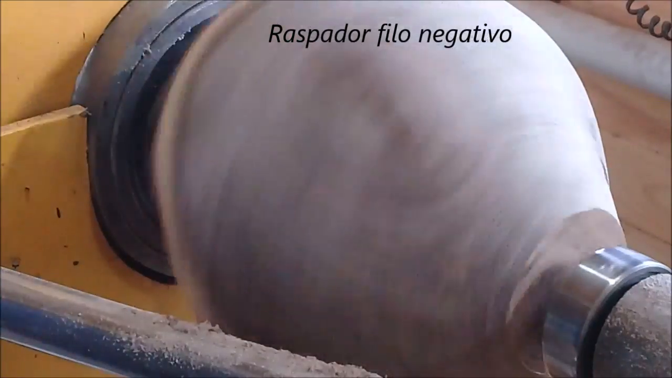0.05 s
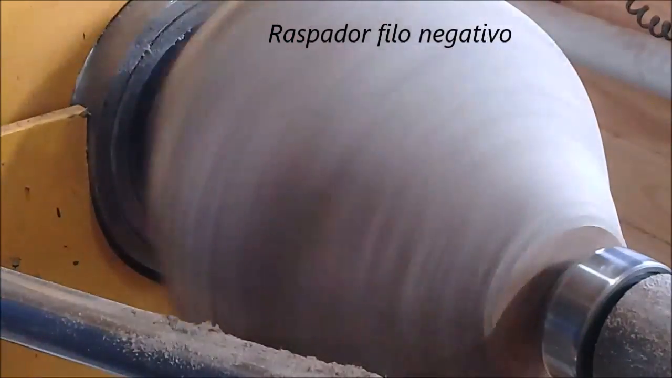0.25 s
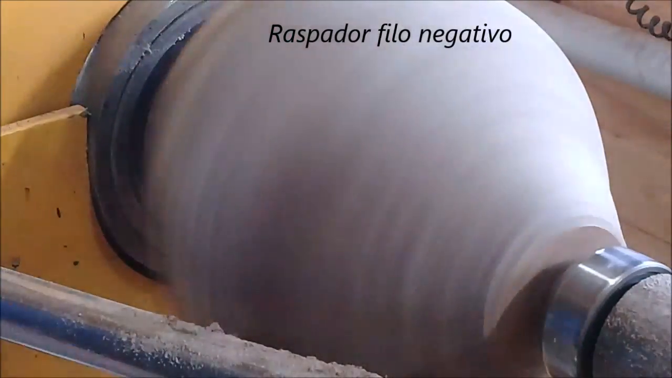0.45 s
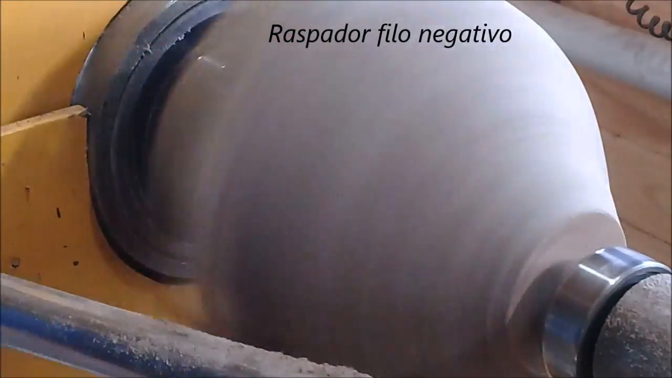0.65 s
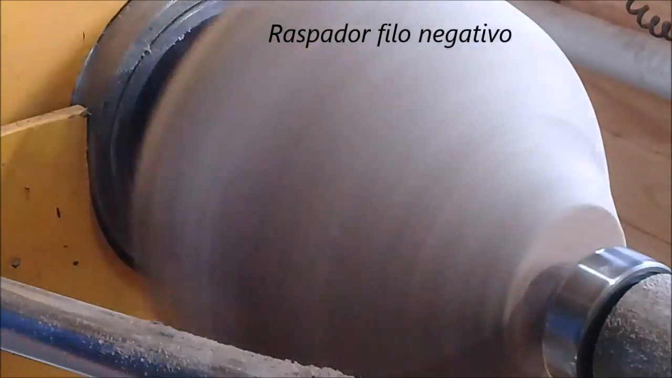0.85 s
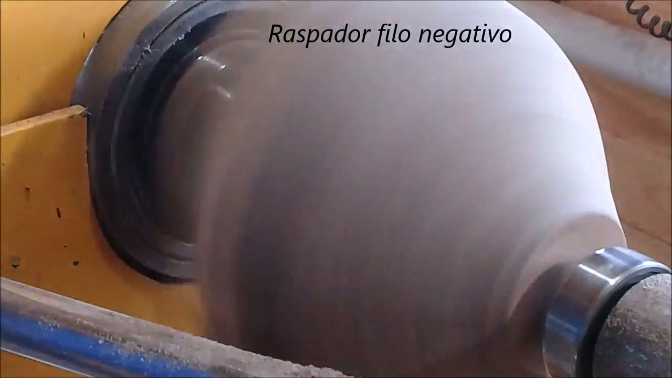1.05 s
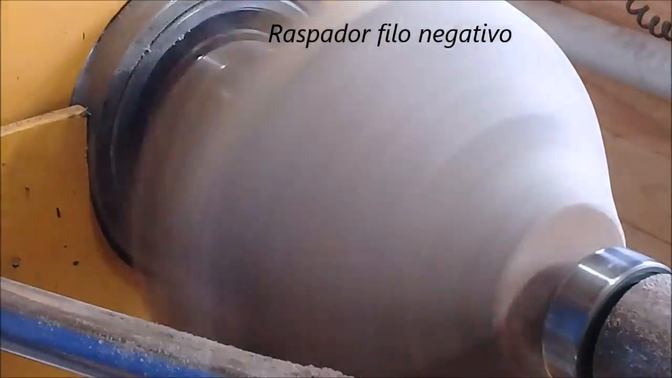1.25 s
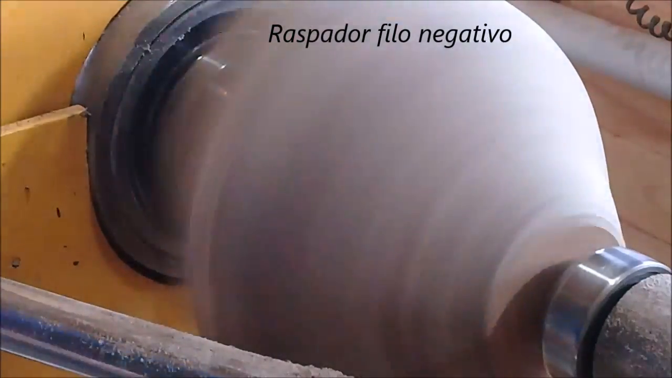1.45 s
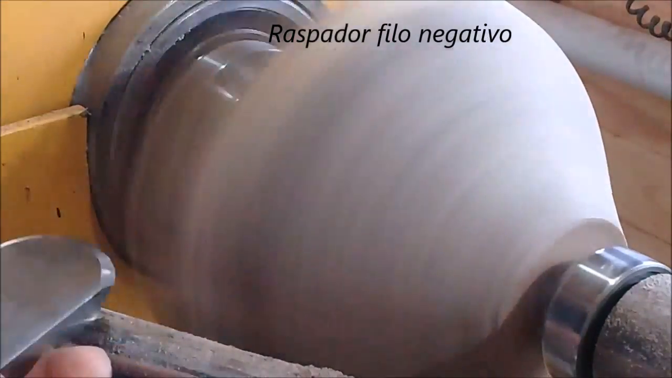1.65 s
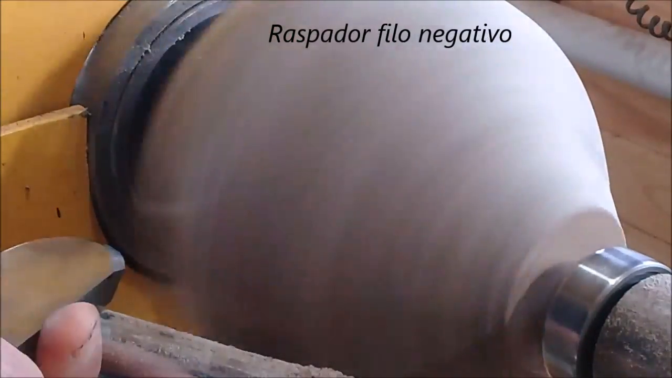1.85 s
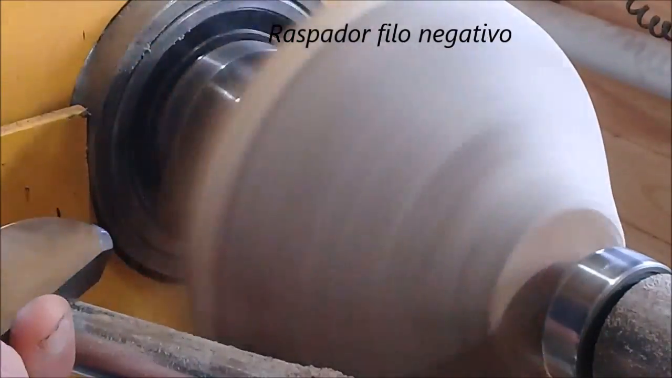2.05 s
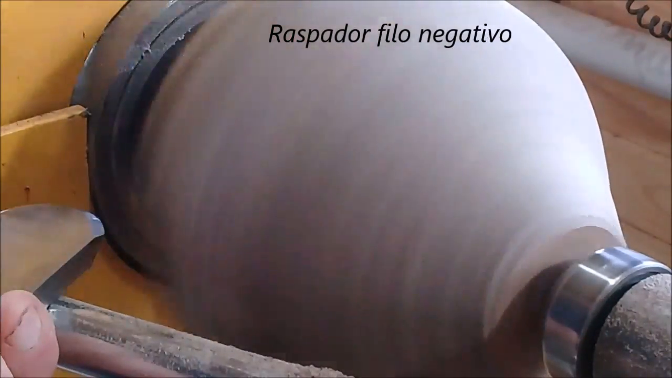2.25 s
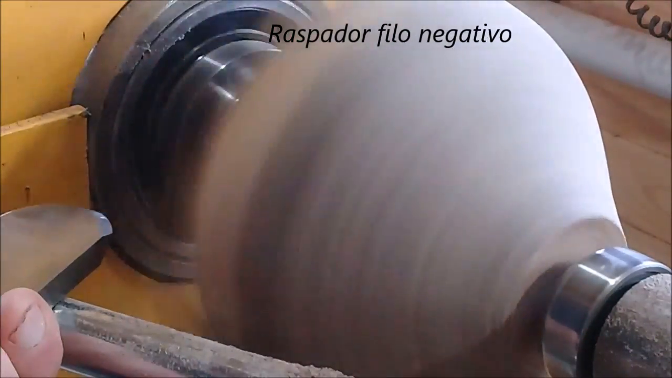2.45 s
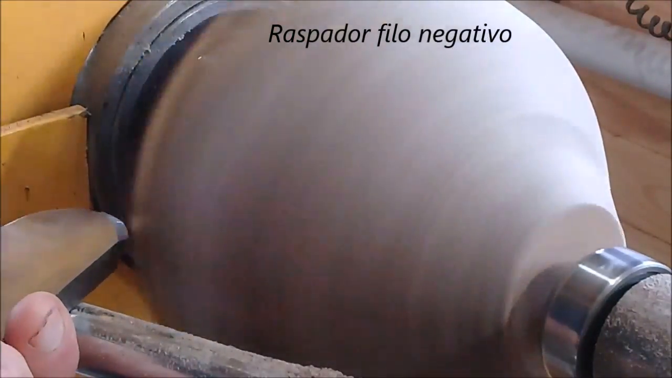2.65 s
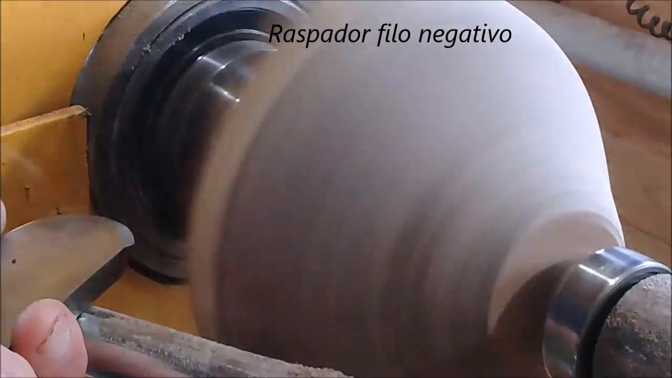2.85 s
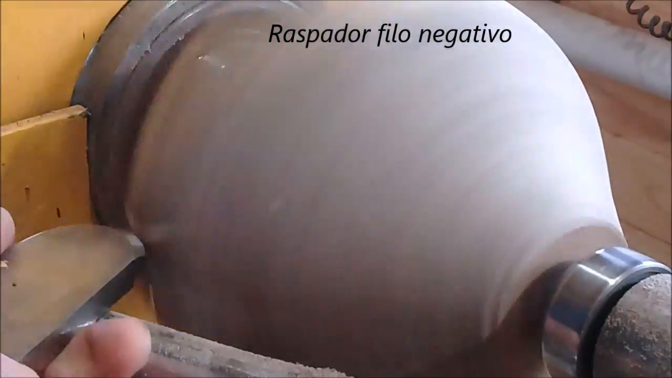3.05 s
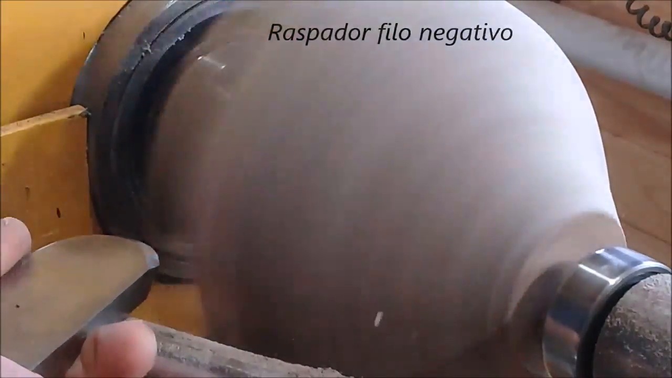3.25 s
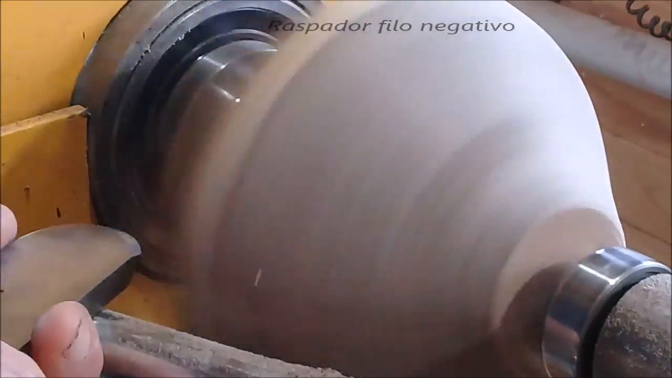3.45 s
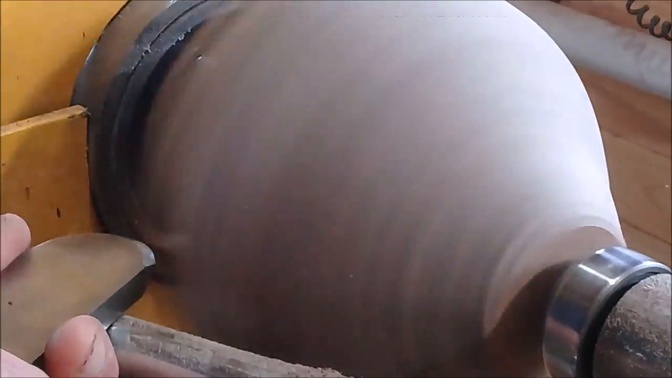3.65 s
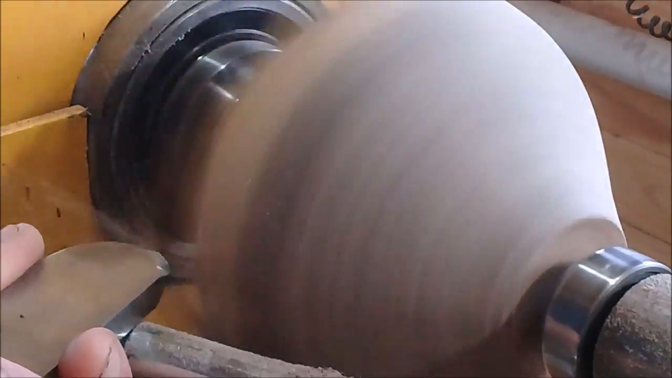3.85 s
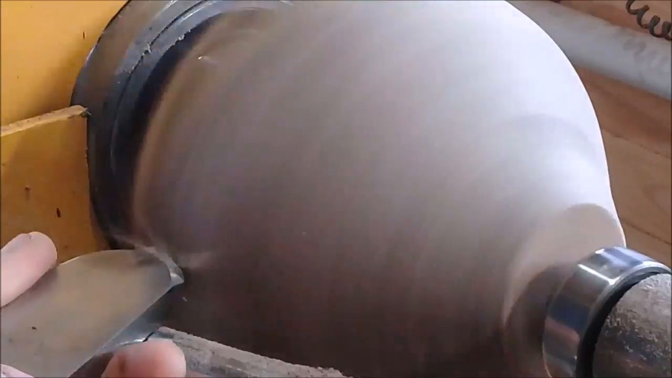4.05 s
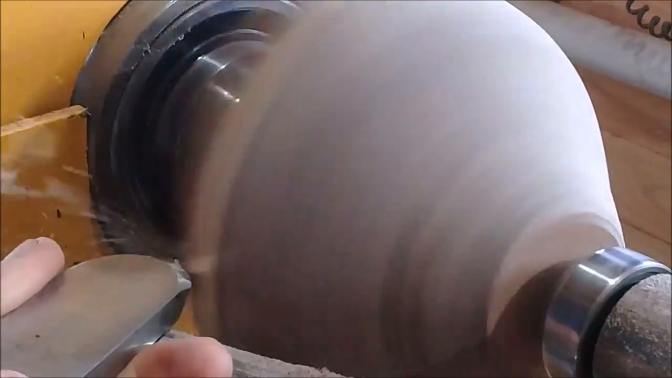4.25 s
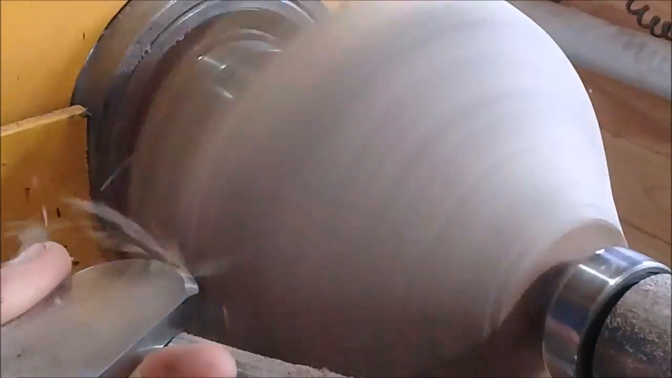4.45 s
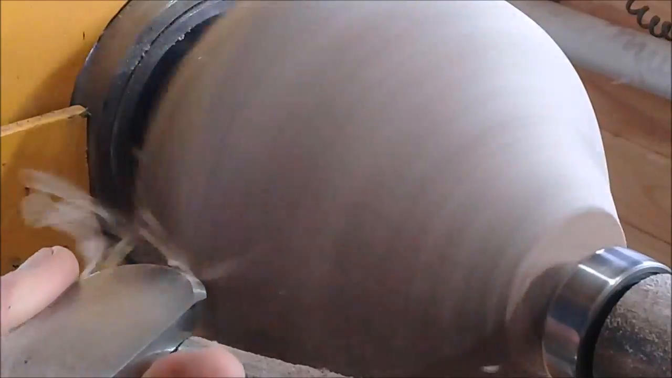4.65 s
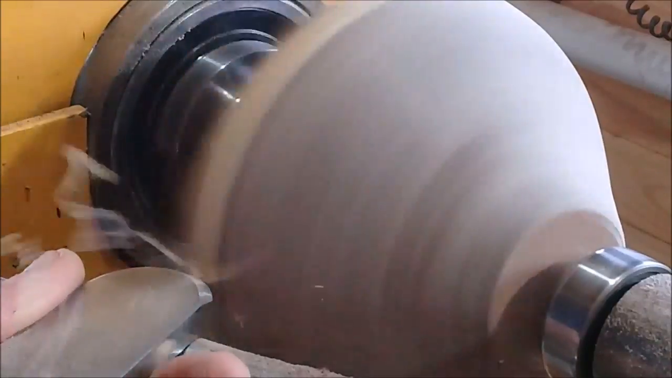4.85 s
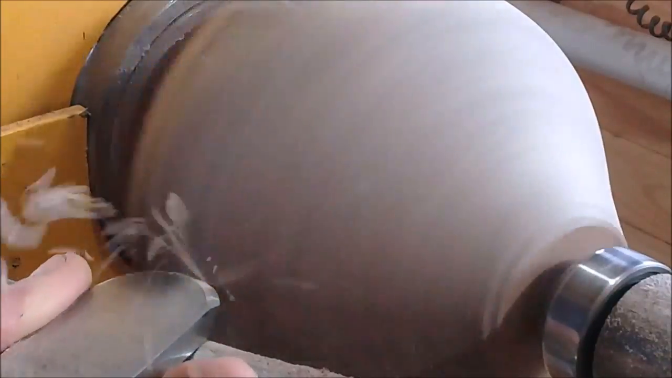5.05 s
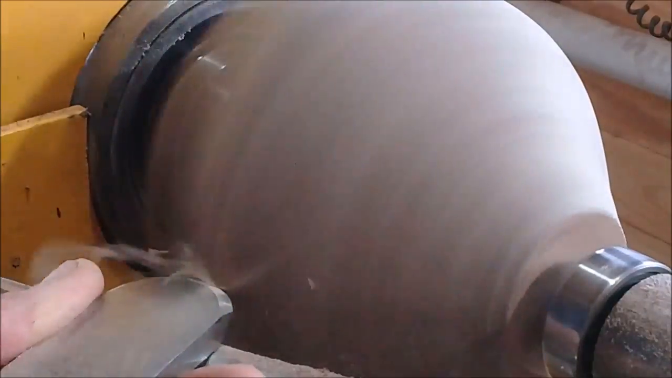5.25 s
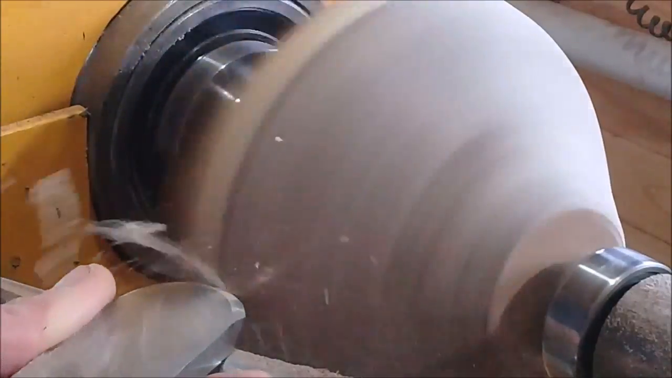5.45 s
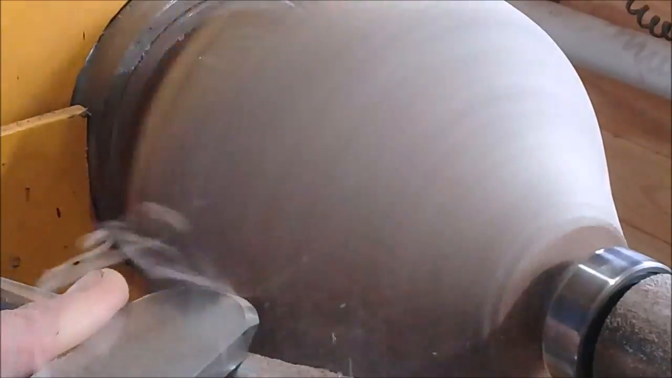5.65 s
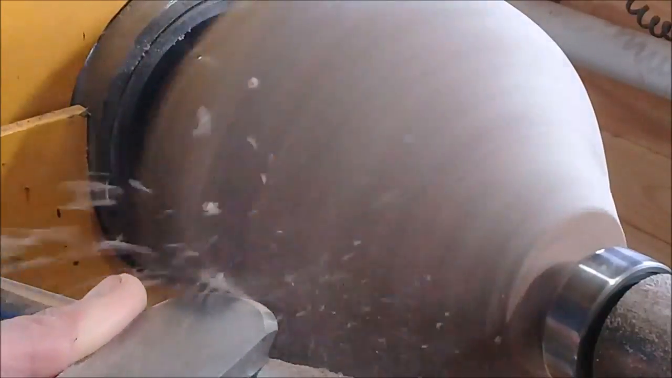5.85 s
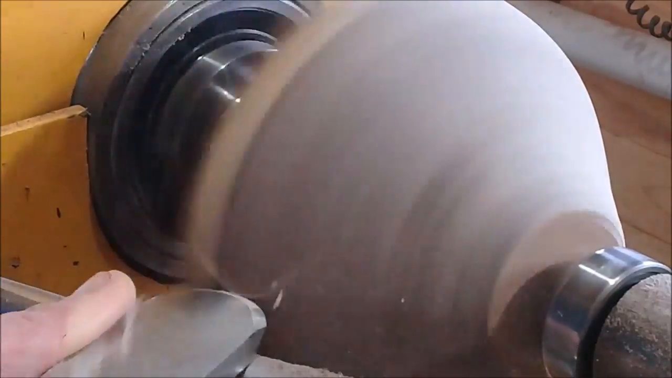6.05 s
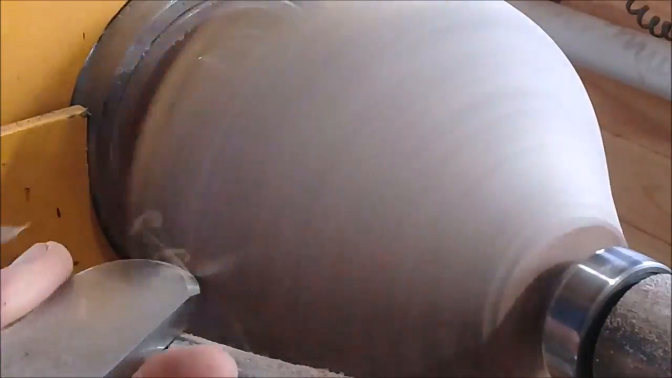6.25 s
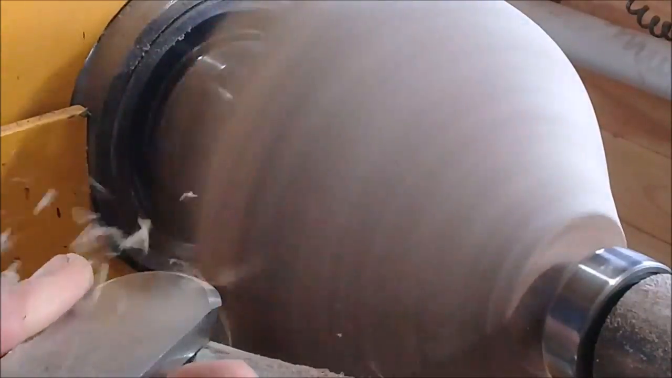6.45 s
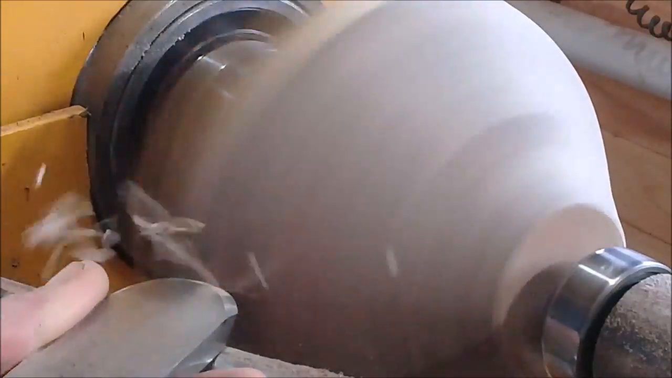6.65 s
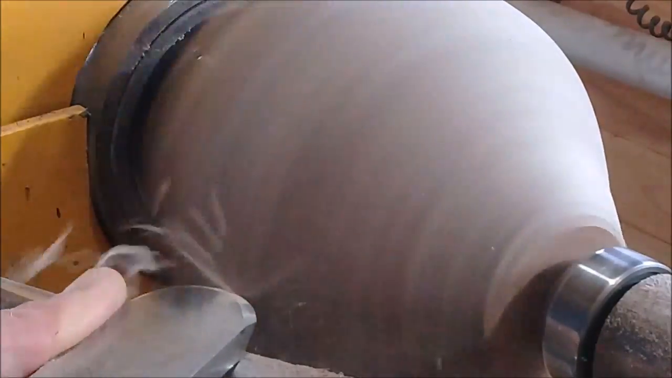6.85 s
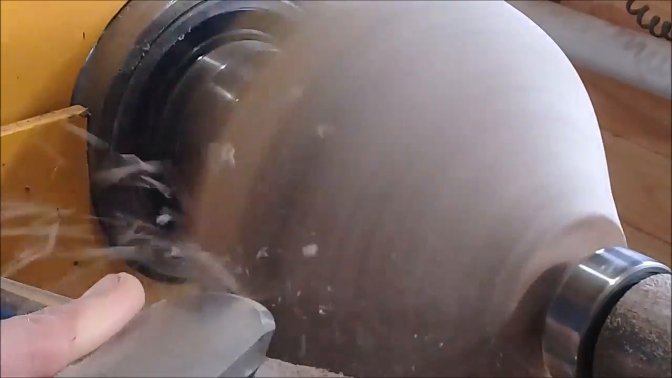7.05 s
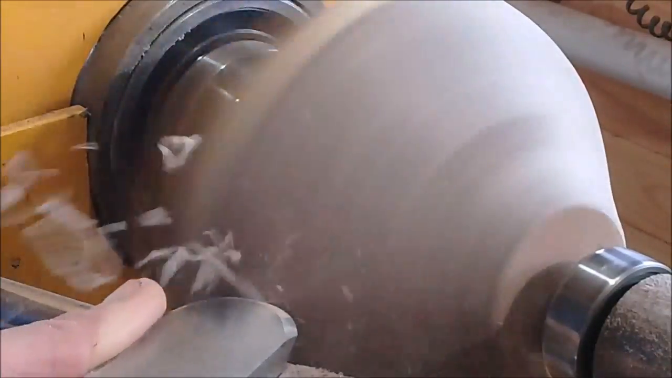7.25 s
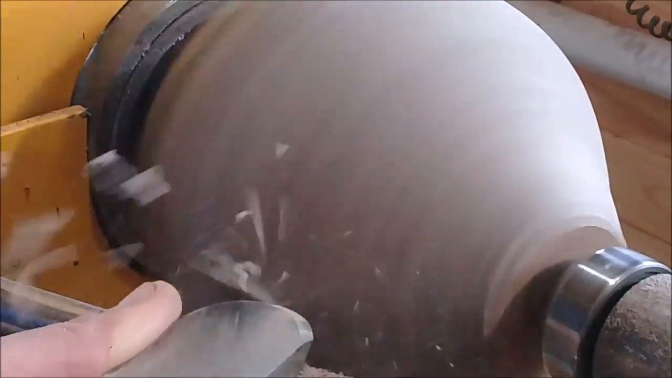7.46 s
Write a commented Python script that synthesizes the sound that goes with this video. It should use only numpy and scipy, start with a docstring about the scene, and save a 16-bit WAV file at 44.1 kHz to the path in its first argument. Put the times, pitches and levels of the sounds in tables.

```python
"""A switch clacks, a moment of silence cuts it short, and a lathe spins a wooden bowl blank up to speed.
While it gathers speed, resonances, throbs and rings swell into hum, casing noise and whirring air.
Knocks on the tool rest follow, then ticks and hiss as a high spot grazes the approaching steel scraper.
Then the edge bites, catching and tearing at first; noise rasps and rings in tool, rest and bowl, partly
repeating as the same surface returns; now and then the whole sound thins briefly to a few pure tones."""
import sys
import numpy as np
from scipy import signal
from scipy.fft import rfft, irfft
from scipy.io import wavfile
from scipy.ndimage import uniform_filter1d

SR = 44100
rng = np.random.default_rng(int(sys.argv[2]) if len(sys.argv) > 2 else 0)


def waveform_to_disk(signal):
    """Save audio, clipped to [-1, 1], as 16-bit WAV at the path in sys.argv[1]."""
    frames = np.transpose(np.atleast_2d(signal))
    scaled = np.clip(frames, -1, 1) * 32767
    samples = np.round(scaled).astype(np.int16)
    wavfile.write(sys.argv[1], SR, samples)


N = 330750
CUTOFF_HZ = 15720   # top of the sound


def amp(db):
    """Decibels to gain."""
    return 10 ** (np.asarray(db) / 20)


def unit(x):
    """Scale to rms 1."""
    return x / np.sqrt(np.mean(x ** 2) + 1e-20)


def seconds():
    """Time of every sample."""
    return np.arange(N) / SR


def noise():
    """Plain white noise."""
    return rng.standard_normal(N)


def in_time(rows):
    """Columns of a table as curves over time, one value a sample."""
    s, *columns = np.transpose(rows)
    return [np.interp(seconds(), s, column) for column in columns]


def drift(rate):
    """Smooth random wandering of spread 1; a higher rate wanders faster."""
    step = 40   # drawn at every 40th sample, then interpolated
    r = np.exp(-2 * np.pi * rate * step / SR)
    draws = rng.standard_normal(N // step + 2002)
    slow = signal.lfilter([1], [1, -2 * r, r * r], draws)[2000:]
    return np.interp(np.arange(N) / step, np.arange(len(slow)), unit(slow))


def colour(x, spectrum):
    """Give a steady noise a spectrum, dark outside its ends; rms 1."""
    hz = np.maximum(np.arange(N // 2 + 1) * SR / N, 1)
    at, level = np.transpose(spectrum)
    level_db = np.interp(np.log(hz), np.log(at), level, left=-90, right=-90)
    return unit(irfft(rfft(x) * amp(level_db), N))


def band(x, low, high):
    """Keep what lies between two frequencies in Hz."""
    return signal.sosfilt(signal.butter(2, [low, high], "band", fs=SR, output="sos"), x)


def resonate(x, peaks, wander_db=0, lean_db=0):
    """Parallel resonances of alternating sign, each wandering in level, leaning low to high; rms 1."""
    out = 0
    for k, (hz, width, level_db) in enumerate(peaks):
        r = np.exp(-np.pi * width / SR)
        poles = [1, -2 * r * np.cos(2 * np.pi * hz / SR), r * r]
        tone = signal.lfilter([(1 - r * r) / 2, 0, (r * r - 1) / 2], poles, x)
        place = (k + .5) / len(peaks) - .5   # from the first mode listed to the last
        mode_db = level_db + lean_db * place
        if wander_db:
            mode_db = mode_db + wander_db * drift(2.0)
        out = out + (-1) ** k * amp(mode_db) * tone
    return unit(out)


def bursts(events, t60):
    """Noise that starts at once at each event and dies away by 60 dB in t60 seconds."""
    starts = np.zeros(N)
    for s, db in events:
        starts[round(s * SR)] = amp(db)
    return signal.lfilter([1], [1, -amp(-60 / (t60 * SR))], starts + 1e-18) * noise()


def swells(events):
    """Bell-shaped swells of gain, one per row."""
    t = seconds()
    return sum(amp(db) * np.exp(-((t - s) / length) ** 2) for s, db, length in events)


def surface(halves, last, before, grain_db, size=664):
    """Wood roughness: each half turn keeps shares of the last two; hard fibres start sharply and fade."""
    fresh = rng.standard_normal((int(halves[-1]) + 10, size))
    memory = [1, -np.clip(last, 0, .6), -np.clip(before, 0, .37)]
    rough = signal.lfilter([1], memory, fresh, axis=0)[8:]
    # hard fibres come round again: 83 places on each half turn
    hard = signal.lfilter([1], [1, -.8], rng.exponential(1, (len(rough), 83)) ** 3, axis=0)
    hard = signal.lfilter([1], [1, -.85], hard.ravel())
    grains = np.log(hard + 1)
    grains = unit(grains - np.mean(grains))
    # read both along the surface as it passes
    fine = signal.resample_poly(rough.ravel(), 4, 1)
    passing = fine[(halves * size * 4).astype(int)]
    return passing * amp(grain_db * grains[(halves * 83).astype(int)])


# The blank showing end grain twice a turn. Each row: time in seconds, rate in half turns per second.
TURNING_RATE = [(0.5, 40), (0.75, 58), (0.8, 64), (0.86, 66.4), (2.7, 66.38), (3.0, 66.5), (4.8, 66.5),
                (5.8, 66.75), (6.2, 66.7), (6.6, 66.4), (7.2, 66.76), (7.5, 66.74)]


def turning():
    """Half turns made so far: the running sum of the spindle's rate."""
    return np.cumsum(in_time(TURNING_RATE)[0]) / SR


# The blank throbbing ever faster as it spins up. Each row: start in seconds, relative level in dB.
SPIN_UP_THROBS = [(0.2558, -50), (0.3127, -52), (0.3571, -47), (0.3945, -46), (0.4244, -48), (0.4544, -45),
                  (0.4844, -51), (0.5212, -62), (0.5472, -56)]
THROB_S = 0.026   # span of a throb, from 12 % of its peak to 12 % again


def throbs():
    """Bell-shaped gain of the spin-up throbs."""
    t = seconds()
    return sum(amp(db) * np.exp(-((t - s - THROB_S / 2) / THROB_S) ** 2 * 8.5)
               for s, db in SPIN_UP_THROBS)


# The scraper on the wood. Each row: time in seconds, relative levels in dB of the tool's low ring, its
# edge and the shaving.
CUT_LEVELS = [(2.795, -44, -48, -52), (2.81, -40, -45, -53), (2.816, -36, -41, -49),
              (2.845, -30.5, -38, -42), (2.865, -41, -42.5, -49.5), (2.92, -34, -39, -46),
              (3.07, -41.5, -46, -45), (3.12, -41, -39.5, -42), (3.2, -34.5, -44, -46),
              (3.26, -46, -44, -44), (3.31, -31.5, -40, -42), (3.36, -40, -40, -38), (3.43, -54, -64, -67),
              (3.57, -58.5, -63, -68), (3.6, -47.5, -39, -45), (3.72, -34, -43.5, -43),
              (3.76, -49, -38.5, -47), (3.8, -35, -50, -41), (3.9, -38, -47.5, -38.5),
              (4.05, -44.5, -46, -40.5), (4.15, -44, -47, -40), (4.51, -48.5, -50.5, -42.5),
              (4.78, -46, -47, -42.5), (4.95, -45.5, -56.5, -44.5), (5.3, -48, -47, -41.5),
              (5.49, -48, -43.5, -42), (5.85, -46, -45, -41.5), (6.04, -47.5, -41.5, -42.5),
              (6.2, -51, -55.5, -54), (6.34, -58, -57.5, -61), (6.355, -50, -56, -45),
              (6.43, -53, -52.5, -45), (6.6, -47, -54.5, -45), (6.78, -48.5, -43.5, -42),
              (7.49, -46.5, -41, -41)]


def biting():
    """True from the moment the edge bites."""
    return seconds() >= CUT_LEVELS[0][0]


def cutting():
    """Levels of tool, edge and shaving in dB; silent before the edge bites."""
    return np.array(in_time(CUT_LEVELS)) - 100 * ~biting()


ROOM_DB = -78


def room():
    """A faint steady floor of white noise."""
    return amp(ROOM_DB) * noise()


# Now and then the bed rumbles up. Each row: time in seconds, relative peak in dB, length in seconds.
BED_BUMPS = [(0.6, -60, 0.083), (0.8, -70, .04), (0.95, -60.5, 0.2), (1.4, -65, 0.06), (1.66, -70, 0.18),
             (2.28, -58.5, 0.059), (2.45, -58.5, 0.15), (2.68, -72, 0.057), (2.87, -66.5, 0.27),
             (3.28, -60, 0.036), (3.49, -63, 0.1), (3.93, -63.5, 0.048), (4.25, -76, 0.14),
             (4.8, -76, 0.049), (5.12, -65, 0.11), (5.31, -73, .05), (6.85, -69, 0.049)]


def rumble():
    """A low rumble through the bed: noise in three low resonances, swelling at the bumps."""
    low = resonate(noise(), [(129.0, 9.2, 10.7), (183, 57, 0.5), (262, 930, 3.6)])
    low = signal.sosfilt(signal.butter(2, 95, "high", fs=SR, output="sos"), low)
    steady = amp(-77 + 1.8 * drift(11))
    return low * (steady + amp(10.0) * swells(BED_BUMPS))


# Each part of the drive swelling as it gathers speed, then holding. Each row: time in seconds, relative
# levels in dB of body, casing, air and high air.
RUN_UP_LEVELS = [(0.1, -36, -89, -69, -61), (0.12, -42.5, -99, -90, -92), (0.25, -50.5, -76, -82, -88),
                 (0.37, -47, -66, -69, -94), (0.47, -47, -63, -65, -83), (0.58, -48, -51, -64, -78),
                 (0.74, -44.5, -49.5, -58, -59.5), (0.8, -44, -43.5, -54, -57), (1.0, -45, -45, -57.5, -57),
                 (2.2, -44.5, -43, -55.5, -57)]
# Spectra of the dragged air, main and high. Each row: frequency in Hz, relative level in dB per Hz.
AIR_SPECTRUM = [(2120, -23), (3600, -38), (4460, -1), (4690, -2), (5710, 4), (6250, -10), (7000, -33),
                (9100, -46), (15400, -120)]
HIGH_AIR_SPECTRUM = [(3820, -20), (6500, 5.5), (6930, 2), (7080, -3), (8440, 8), (11100, 1), (12800, -14),
                     (14900, 2), (15900, -4)]
# Brief puffs of bright hiss. Each row: time in seconds, relative peak in dB, length in seconds.
HISS_PUFFS = [(0.64, -60, 0.019), (0.78, -59, 0.015), (0.85, -55, 0.0093), (1.48, -67, 0.011),
              (1.72, -60, 0.025)]


def whirr():
    """Air dragged by the blank: two noise bands, the main one throbbing in spin-up; puffs then and later."""
    air_db, high_db = in_time(RUN_UP_LEVELS)[2:]
    puffs = swells(HISS_PUFFS)
    air_gain = amp(air_db + 1.8 * drift(45)) + amp(-16.0) * throbs() + puffs
    high_gain = amp(high_db + 1.0 * drift(38)) + amp(3) * puffs
    air = colour(noise(), AIR_SPECTRUM) * air_gain
    high = colour(noise(), HIGH_AIR_SPECTRUM) * high_gain
    return air + high


# Short rings while the drive gathers speed. Each row: time in seconds, relative peak in dB, length in
# seconds, frequency in Hz.
SPIN_UP_RINGS = [(0.253, -53.5, .035, 1166), (0.317, -66, .06, 3300), (0.337, -51, 0.024, 1205),
                 (0.374, -53, 0.037, 1074), (0.45, -52, 0.032, 2700), (0.578, -50, 0.035, 1770),
                 (0.636, -49, 0.014, 3860), (0.662, -57, .03, 3420)]


def rings():
    """Narrow resonances (45 Hz wide) shaken by noise, each swelling once."""
    push = noise()
    return sum(swells([(s, db, length)]) * resonate(push, [(hz, 45, 0)])
               for s, db, length, hz in SPIN_UP_RINGS)


# How the cut loads the drive: a pair for body and one for casing, each holding the level in dB added
# to the tool's level, then to the shaving's level.
BODY_LOAD = (-8, -4.5)
CASING_LOAD = (-35, -14)


def loaded_gain(idle_db, load):
    """Gain of a drive part: its idle power plus the power the cut puts in."""
    tool_db, _, shaving_db = cutting()
    by_tool, by_shaving = load
    power = amp(idle_db) ** 2 + amp(tool_db + by_tool) ** 2 + amp(shaving_db + by_shaving) ** 2
    return np.sqrt(power)


# Spectrum of the headstock's body. Each row: frequency in Hz, relative level in dB per Hz.
BODY_SPECTRUM = [(88, -39), (150, -22), (345, -17), (399, -10.5), (456, -20.5), (516, -13), (661, -9),
                 (723, -8.5), (1000, -2), (2200, -12), (2860, -9), (4840, -120)]
# Headstock resonances that speak while the motor pulls up. Each row: frequency in Hz, width in Hz,
# relative level in dB.
PULL_MODES = [(172, 4, -18), (368, 230, -5), (820, 290, -3.5), (1250, 110, -1.5), (1820, 58, -16)]
WAKE_S_PER_KHZ = 0.072   # higher resonances of the headstock wake later


def headstock(halves):
    """Body noise: a few resonances at first, the full returning roughness once up to speed."""
    t = seconds()
    push = noise()
    pulling = 0
    for k, (hz, width, db) in enumerate(PULL_MODES):
        awake = np.clip((t - .03 - WAKE_S_PER_KHZ * hz / 1000) / 0.18, 0, 1)
        level = amp(db + 2.5 * np.log10(width) - 9.0)   # wide modes speak louder
        pulling = pulling + (-1) ** k * level * resonate(push, [(hz, width, 0)]) * awake
    full = colour(surface(halves, last=0.013, before=0.36, grain_db=0.77), BODY_SPECTRUM)
    settled = np.clip((t - .2) / .5, 0, 1)
    body = np.sqrt(settled) * full + np.sqrt(1 - settled) * pulling
    body_db = in_time(RUN_UP_LEVELS)[0]
    return body * loaded_gain(body_db, BODY_LOAD) * amp(-1.4 + 1.26 * drift(15.0))


# Casing modes, and the main ring shaken by plain noise. Each row: frequency in Hz, width in Hz,
# relative level in dB.
CASING_MODES = [(2338, 190, -5.5), (2690, 42, -1.5), (2846, 45, -1), (2935, 27, -0.5), (3056, 15, 1),
                (3350, 810, -7.5)]
CASING_MAIN_RING = [(2760, 39, 0)]
# The main ring's swelling. Each row: time in seconds, level in dB against the other modes.
MAIN_RING_LEVEL = [(.3, 7), (.7, -3), (1.5, -0.5), (2.7, -2.5), (3.2, 0.5), (4.0, 0), (5.0, -0.5), (6.0, 1),
                   (6.8, 1), (7.5, 2)]
CASING_THROB_DB = 55   # how far the throbs shake the casing


def casing(halves):
    """Metal casing: modes shaken by the returning surface, plus a ring shaken by plain noise."""
    roughness = surface(halves, last=0.26, before=0.38, grain_db=0.76)
    modes = resonate(roughness, CASING_MODES, wander_db=0.24)
    main = amp(in_time(MAIN_RING_LEVEL)[0]) * resonate(noise(), CASING_MAIN_RING)
    gain = loaded_gain(in_time(RUN_UP_LEVELS)[1], CASING_LOAD)
    gain = gain * (1 + amp(CASING_THROB_DB) * throbs())
    return unit(modes + main) * gain * amp(1.0 + 0.59 * drift(28))


# Loose drive tones. Each row: frequency in Hz, then level in dB rms at each of the three moments, which
# are listed in seconds.
LOOSE_TONES = [(629.6, -61.5, -64.5, -56.5), (761, -75, -64, -50), (1114, -59, -60.5, -63),
               (1215, -59, -56, -58)]
TONE_MOMENTS = (1.0, 4.5, 7.3)
# Four hum tones that wax and wane on their own. Each row: time in seconds, relative level in dB of each.
# Their multiples of the half-turn rate stand in a list.
WAXING_LEVELS = [(1.0, -55, -52, -50, -55), (1.32, -70, -51.5, -59, -53), (2.05, -71, -58, -65, -57),
                 (2.45, -82, -57, -61, -57), (3.37, -48, -59, -58, -66), (3.43, -61, -66, -71, -69),
                 (3.99, -52, -57, -54, -51), (4.2, -69, -49, -61, -46.5), (4.71, -61, -56, -48, -71),
                 (4.78, -65, -48, -48, -51), (6.03, -67, -52, -67, -64), (6.05, -66, -63, -70, -48),
                 (6.41, -70, -55, -57, -61), (7.08, -55, -52, -55, -58), (7.46, -56, -56, -60, -56),
                 (7.5, -56.5, -56.5, -58, -55)]
WAXING_MULTIPLES = (11, 12, 14, 16)


def drive_tones(halves):
    """Sines of the drive, some at fixed pitch with a wavering phase, some tied to the turning."""
    t = seconds()
    out = 0
    for hz, *levels in LOOSE_TONES:
        level_db = np.interp(t, TONE_MOMENTS, levels) + 2.95 * drift(15.0)
        out = out + np.sqrt(2) * amp(level_db) * np.cos(2 * np.pi * hz * t + 1.0 * drift(2.65))
    for k, db in zip(WAXING_MULTIPLES, in_time(WAXING_LEVELS)):
        phase = 2 * np.pi * (k * halves + rng.random())
        out = out + np.sqrt(2) * amp(db - 1.5 + 2.0 * drift(5.2)) * np.cos(phase)
    return out * np.clip((t - .6) / 0.27, 0, 1)


# Hum partials. Each row: multiple of the half-turn rate, relative level in dB running free, dB added
# while the motor strains, dB added by the cut.
HUM_PARTIALS = [(0.96, -27, 7, 0.5), (2.05, -31, 4, -8), (7.07, -18, 17, 0), (7.99, 5, -1.5, -3),
                (9.964, 6.5, 3, -1.5), (13.14, -1.5, 6, -11), (15.03, 1, 7, 0), (17.82, -21, .1, -1),
                (18.76, -8, 9, 5.5), (19.95, -6, 6.5, 5), (24.1, -1.5, -0.5, -1.5)]
# The hum's swelling. Each row: time in seconds, relative level in dB.
HUM_SWELL = [(0.56, -58), (0.81, -55), (1.16, -58), (2.47, -56), (2.57, -58), (3.3, -52), (3.75, -57),
             (4.27, -51), (4.82, -54), (5.67, -54), (5.9, -52), (6.27, -56), (6.64, -53), (7.49, -52)]
STEADY_HZ = 400.2   # a hum tone that does not follow the turning
STRAIN_S = 0.85   # time constant: the strain dies away after the motor reaches speed
HUM_WAVER_DB = 0.1555   # slow wavering, per multiple


def hum(halves):
    """Motor hum: a steady tone plus sines locked to the turning, shifted by strain and cut."""
    t = seconds()
    steady = np.sqrt(2) * np.cos(2 * np.pi * STEADY_HZ * t) * np.clip((t - .52) / 0.021, 0, 1)
    strain = np.exp(-np.maximum(t - .9, 0) / STRAIN_S)
    loaded = np.clip((cutting()[0] + 59) / 9.5, 0, 1)
    partials = 0
    for k, db, strain_db, cut_db in HUM_PARTIALS:
        waver_db = HUM_WAVER_DB * k * drift(2.0) + 0.14 * drift(21)
        level = amp(db + strain_db * strain + cut_db * loaded + waver_db)
        partials = partials + level * np.cos(2 * np.pi * (k * halves + rng.random()))
    running = np.clip((t - .6) / 0.27, 0, 1)
    return (steady + partials * running * amp(-1.0)) * amp(in_time(HUM_SWELL)[0] + 0.5)


# The switch. Each row: frequency in Hz, relative level in dB per Hz.
CLACK_SPECTRUM = [(59, -47), (100, -30), (310, 0.5), (391, -5), (462, -10), (524, -11), (607, -1),
                  (674, -9), (1530, -20), (1960, -5), (2800, -1), (3680, 1), (7830, -11.5), (8880, -21),
                  (15000, -30)]
CLACK_DB, CLACK_T60_S = -28.5, 0.2   # starting level, time to fall by 60 dB


def switch():
    """A metallic clack: coloured noise dying away."""
    return colour(noise(), CLACK_SPECTRUM) * amp(CLACK_DB - 60 * seconds() / CLACK_T60_S)


# The tool sliding along its rest. Each row: time in seconds, relative peak in dB.
REST_KNOCKS = [(0.799, -37), (2.34, -39), (2.454, -38)]
# Modes of the rest. Each row: frequency in Hz, width in Hz, relative level in dB.
REST_MODES = [(649, 31, -5), (222, 66, -19.5), (1030, 58, -24), (305, 18, -20), (460, 42, -14)]


def knocks():
    """Dull knocks: dying noise bursts ring the rest."""
    blows = bursts(REST_KNOCKS, 0.31)
    return resonate(blows, REST_MODES) * np.std(blows) * amp(-2.0)


# A high spot grazing the approaching tool. Each row: time in seconds, relative level in dB.
GRAZE_LEVEL = [(2.3, -53), (2.34, -45), (2.45, -45), (2.52, -42.5), (2.62, -42), (2.7, -40.5), (2.78, -42)]
# Hiss of a graze. Each row: frequency in Hz, relative level in dB per Hz.
GRAZE_HISS_SPECTRUM = [(4000, 6), (7000, 2), (8400, 4), (10200, 9), (12000, -2), (15700, -6)]
TICK_DB, HISS_DB, SNAP_DB = -10, 1, -4   # balance of the graze's parts
GRAZE_LAG = .36   # delay, share of a half turn
HISS_SHARE, SNAP_SHARE = 0.7, .1   # decay constants, shares of a half turn


def grazes(halves):
    """Each half turn a click rings two modes, with fading hiss and a shorter, brighter snap."""
    lagged = halves - GRAZE_LAG
    clicks = np.diff(np.floor(lagged), prepend=-1) * amp(2 * drift(30))
    ticks = resonate(clicks, [(5570, 280, 1), (6260, 360, -6)]) * amp(TICK_DB)
    hiss = colour(noise(), GRAZE_HISS_SPECTRUM) * np.exp(-(lagged % 1) / HISS_SHARE)
    hiss = hiss * amp(HISS_DB + 1.0 * drift(25))
    snap = colour(noise(), [(11000, -10), (12500, 0), (15700, 0)])
    snap = snap * np.exp(-(lagged % 1) / SNAP_SHARE) * amp(SNAP_DB + 2.5 * drift(30))
    approaching = abs(seconds() - 2.55) < .25
    return (ticks + hiss + snap) * amp(in_time(GRAZE_LEVEL)[0]) * approaching


# The edge catching in the wood. Each row: time in seconds, relative peak in dB.
EDGE_CATCHES = [(2.7963, -30), (2.8125, -17), (2.8275, -16.5), (2.8335, -34), (2.845, -30), (2.9061, -27),
                (2.921, -35.5), (2.935, -30), (2.9635, -27), (3.147, -21), (3.1914, -28), (3.204, -18),
                (3.273, -18.5), (3.3047, -19), (3.59, -23.5)]
# Modes of tool and rest, in three groups. Each row: frequency in Hz, width in Hz, relative level in dB.
TOOL_MODES = [(2357, 120, -6), (2910, 130, -3), (3190, 65, -2), (3202, 63, 1), (3324, 30, 2.5),
              (3455, 28, -3), (3570, 240, -5.5)]
SHANK_MODES = [(7250, 130, -6), (7800, 200, 0), (8110, 90, -3), (8400, 70, -4), (8580, 70, -5),
               (9110, 80, -4)]
EDGE_MODES = [(9820, 250, -6), (10110, 110, 0), (10400, 110, 0), (10600, 90, -3), (10930, 80, -5)]


def catches():
    """Sudden jolts of noise, heard directly and through the modes of tool, shank and edge."""
    jolts = bursts(EDGE_CATCHES, t60=0.034)
    direct = band(jolts, 2500, 12000)
    ringing = resonate(jolts, TOOL_MODES) + resonate(jolts, SHANK_MODES + EDGE_MODES)
    return amp(-2.5) * (amp(-7.5) * direct + np.std(direct) * amp(-6.0) * ringing)


# Two hard spots striking the edge each half turn. Each row: time in seconds, level in dB of the first
# and of the second against the rasp between them. Their places are listed as shares of a half turn.
SPOT_LEVELS = [(2.8, 5, -8), (2.87, 10, -2), (3.05, 0, -4), (3.2, 3, -3), (3.4, 1, -3), (3.6, 1, -6),
               (4.1, -2, -11), (4.6, -11, -8), (5.4, -1, -12), (5.8, 3, -3), (6.1, -5, 7), (6.5, -9, -4),
               (7.1, -4.5, -8), (7.5, -10, -1)]
SPOT_PLACES = (.88, 0.52)
SPOT_SHARE = 0.33   # decay constant, share of a half turn


def spots(halves):
    """Gain that jumps at each hard spot and dies away, evened in power."""
    strengths = amp(np.array(in_time(SPOT_LEVELS)) + 2.3 * drift(20))
    gain = 1 + sum(strength * np.exp(-((halves - at) % 1) / SPOT_SHARE)
                   for strength, at in zip(strengths, SPOT_PLACES))
    return gain / np.sqrt(uniform_filter1d(gain ** 2, size=1324))


FLUTTER_DB, FLUTTER_FOLLOWS = 0.5666, 0.048   # unsteadiness at -55 dB tool level, its growth per dB
# the grain bites hardest at set places: swing once and twice a half turn, scaled by the tool's level
GRAIN_ONCE_DB, GRAIN_TWICE_DB = -1.9, -0.7
GRAIN_AT, GRAIN_FOLLOWS = 0.023, 0.029   # place as a share of a half turn, growth per dB of tool level


def flutter():
    """Unsteadiness of the cut in dB, larger under a strong cut."""
    return FLUTTER_DB * np.clip(1.0 + FLUTTER_FOLLOWS * (cutting()[0] + 55), .2, 3)


def bite(halves):
    """Gain of the contact: random flutter, the grain's regular swing and the hard spots."""
    turn = 2 * np.pi * (halves - GRAIN_AT)
    swing_db = GRAIN_ONCE_DB * np.cos(turn) + GRAIN_TWICE_DB * np.cos(2 * turn)
    swing_db = swing_db * np.clip(0.5 + GRAIN_FOLLOWS * (cutting()[0] + 27), .2, 2)
    return amp(flutter() * drift(20) + swing_db) * spots(halves)


# Bowl modes under the edge, and the lowest shank modes, which sing out only at times. Each row:
# frequency in Hz, width in Hz, relative level in dB.
BOWL_MODES = [(711, 36, -2.5), (940, 25, -15), (1280, 78, -3), (1320, 80, -7.5), (1611, 43, 6)]
LOW_SHANK_MODES = [(6950, 34, 3), (6800, 25, -5), (7315, 210, -10.5)]
# How strongly these two ring. Each row: time in seconds, relative level in dB.
BOWL_LEVEL = [(2.8, -55), (3.0, -50.5), (3.12, -34.5), (3.24, -55), (3.33, -44.5), (3.4, -68),
              (3.57, -69.5), (3.68, -40.5), (3.85, -44), (4.08, -46.5), (4.5, -49), (5.0, -53), (6.1, -65),
              (6.25, -71), (6.7, -52), (7.5, -55.5)]
LOW_SHANK_LEVEL = [(2.8, -48), (3.36, -50.5), (3.42, -66), (3.57, -67.5), (3.62, -47), (4.1, -55),
                   (5.08, -79), (5.47, -57), (5.7, -46.5), (6.08, -41.5), (6.22, -55), (6.6, -82),
                   (6.8, -53), (7.0, -60), (7.5, -60)]
# Two tool modes that squeal at times. Each row: frequency in Hz, width in Hz.
SQUEAL_MODES = [(3055, 26), (3386, 40)]
# The squeals. Each row: time in seconds, relative level in dB of the lower, of the upper.
SQUEAL_LEVELS = [(2.8, -52, -42), (2.83, -38, -38), (2.86, -43, -53), (3.24, -45, -49), (3.34, -41, -39),
                 (3.41, -62, -61), (3.49, -56, -61), (3.56, -63, -72), (3.6, -56.5, -53), (3.7, -50, -37.5),
                 (4.04, -44, -43), (4.07, -42, -51), (4.55, -51, -53), (5.86, -60, -65), (5.99, -46, -49),
                 (6.29, -57, -62), (6.6, -53, -57), (7.04, -70, -66), (7.09, -55, -57), (7.5, -47, -59)]


def singing(contact):
    """Bowl, low shank and squealing modes, shaken by the contact and each swelling at its own times."""
    out = 0
    for modes, level in [(BOWL_MODES, BOWL_LEVEL), (LOW_SHANK_MODES, LOW_SHANK_LEVEL)]:
        out = out + resonate(contact, modes, wander_db=7.0) * amp(in_time(level)[0])
    for (hz, width), db in zip(SQUEAL_MODES, in_time(SQUEAL_LEVELS)):
        out = out + resonate(contact, [(hz, width, 0)]) * amp(db - 1.0)
    return out * biting()


# Higher modes of tool and rest, and modes of the shaving. Each row: frequency in Hz, width in Hz,
# relative level in dB.
BLADE_MODES = [(4110, 90, -2), (4325, 55, -1), (5010, 110, -4), (5600, 130, -2)]
SHAVING_MODES = [(12100, 100, -9), (12600, 120, -9), (13500, 80, -5), (13760, 90, 0), (13950, 80, -1),
                 (14200, 100, -2), (14750, 220, -6)]
# The broad rasp under the modes. Each row: frequency in Hz, relative level in dB per Hz.
RASP_SPECTRUM = [(1400, 28.5), (3000, -5.5), (6000, -9), (10000, -0.5), (12000, 1), (15900, -3)]
# How tool, blade, shank, edge and shaving speak, one row for each. Each row: broad rasp against the modes
# in dB, coupling to the air in dB, share (0-1) following the tool's level rather than the edge's (the
# shaving's own for the shaving), rasp added by a ragged cut in dB, lean of a ragged cut towards the
# higher modes in dB.
MODE_GROUPS = [(-3.5, -1.5, 0.86, -6, 6), (2.5, -1.5, 0.61, 0, 1), (8.5, -0.5, 0.27, 11, -11),
               (-11, 2.7, .01, 7, -26), (-1.5, -1, .01, 11, -14)]
# Fresh tearing in place of the returning surface. Each row: time in seconds, raggedness as a share 0-1.
RAGGEDNESS = [(2.8, 1), (3.4, 0.5), (3.75, 0.45), (4.0, 0.54), (4.3, 0.5), (4.8, 0.57), (5.5, 0.44),
              (6.1, 0.4), (6.4, 0.56), (6.8, 0.5), (7.5, 0.2)]
# The shank's level against the rest, sinking slightly. Each row: time in seconds, level added in dB.
SHANK_TREND = [(2.8, 0.6), (7.5, -0.2)]


def scraper(halves):
    """The rough contact rasps and shakes tool and rest; which modes speak depends on how the edge bites."""
    ragged = np.clip(in_time(RAGGEDNESS)[0], 0, 1)
    returning = unit(surface(halves, last=0.55, before=0.26, grain_db=1.0))
    tearing = unit(surface(halves, last=0, before=0, grain_db=1.5))
    contact = np.sqrt(1 - ragged) * returning + np.sqrt(ragged) * tearing
    rasp = colour(surface(halves, last=0.494, before=0.3, grain_db=1.5), RASP_SPECTRUM)
    tool_db, edge_db, shaving_db = cutting()
    flutter_db = flutter()
    sound = singing(contact)
    groups = [TOOL_MODES, BLADE_MODES, SHANK_MODES, EDGE_MODES, SHAVING_MODES]
    for k, (modes, settings) in enumerate(zip(groups, MODE_GROUPS)):
        rasp_db, coupling_db, share, ragged_rasp_db, ragged_lean_db = settings
        broad = unit(band(rasp, max(.89 * modes[0][0], 2600), min(1.06 * modes[-1][0], CUTOFF_HZ)))
        rasp_gain = amp(rasp_db + ragged_rasp_db * (ragged - 0.67))
        ringing = resonate(contact, modes, wander_db=1.3, lean_db=ragged_lean_db * (ragged - 0.56))
        # alternate signs: no holes where bands meet
        group = (ringing + (-1) ** k * rasp_gain * broad) / np.sqrt(1 + rasp_gain ** 2)
        other_db = shaving_db if modes is SHAVING_MODES else edge_db
        level_db = share * tool_db + (1 - share) * other_db
        if modes is SHANK_MODES:
            level_db = level_db + in_time(SHANK_TREND)[0]
        sound = sound + unit(group) * amp(level_db + coupling_db + 1.22 * flutter_db * drift(23))
    return sound * bite(halves) + catches()


# Moments in seconds when the whole lathe sound thins to a few pure tones.
THIN_MOMENTS = [3.321, 3.385, 3.621, 4.088, 4.732, 4.878, 5.135, 5.838, 5.943, 6.586]
THIN_S, THIN_RING_S, THIN_DB = 0.008, 0.011, 3   # half-lengths of dip and tones, tone boost


def thin(x, size=1024, count=16):
    """The sound dips briefly while the strongest line of each region sounds as a pure tone."""
    out, hz = x.copy(), np.arange(size // 2 + 1) * SR / size
    t = (np.arange(2 * size) - size) / SR
    dip = 1 - 0.84 * np.exp(-(t / THIN_S) ** 4)
    ring = amp(THIN_DB) * np.exp(-(t / THIN_RING_S) ** 4)
    edges = np.geomspace(8, 350, count).astype(int)
    for s in THIN_MOMENTS:
        at = round(s * SR) - size
        lines = rfft(x[at:at + size] * np.hanning(size)) * 4 / size
        tops = [low + np.argmax(abs(lines[low:high])) for low, high in zip(edges, edges[1:])]
        tones = sum(abs(lines[k]) * np.cos(2 * np.pi * (hz[k] * t + rng.random())) for k in tops)
        out[at:at + 2 * size] = x[at:at + 2 * size] * dip + tones * ring
    return out


# Start and end in seconds of the silence after the clack, with only the room's floor left.
SILENCE = (0.0617, 0.0952)


def scene():
    """The clack is cut short by a moment of silence, then the lathe starts."""
    t = seconds()
    halves = turning()
    drive = rumble() + rings() + headstock(halves) + casing(halves) + drive_tones(halves) + hum(halves)
    handling = knocks() + grazes(halves)
    lathe = thin(drive + whirr() + handling + scraper(halves))
    sound = room() + switch() * (t < SILENCE[0]) + lathe * (t > SILENCE[1])
    return sound[None]


def record(dry):
    """The top is cut steeply."""
    return signal.sosfilt(signal.ellip(12, .5, 70, CUTOFF_HZ, fs=SR, output="sos"), dry)


dry = scene()
out = record(dry)
waveform_to_disk(out)
```